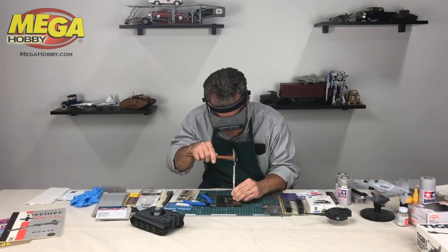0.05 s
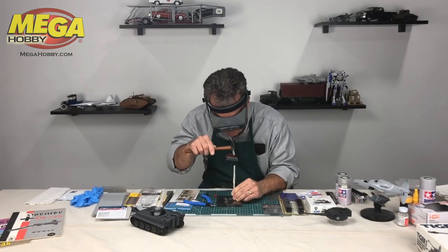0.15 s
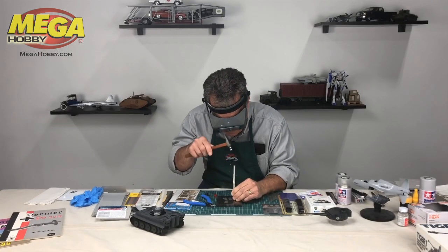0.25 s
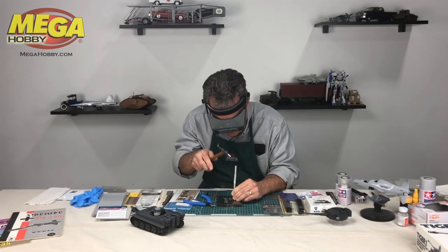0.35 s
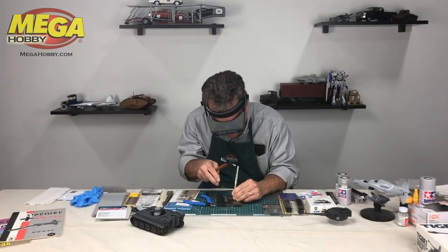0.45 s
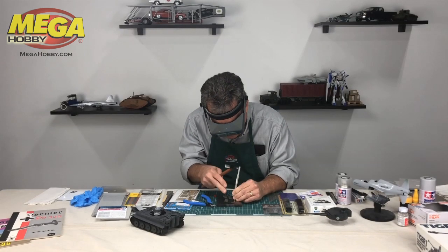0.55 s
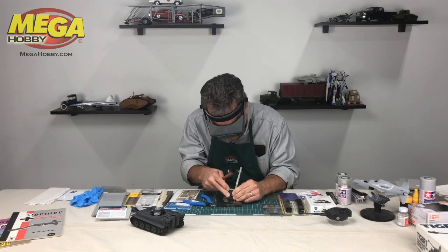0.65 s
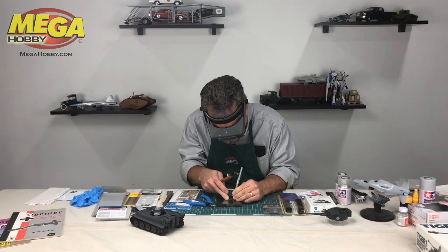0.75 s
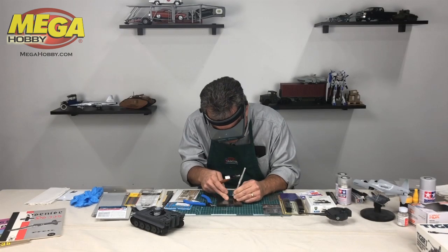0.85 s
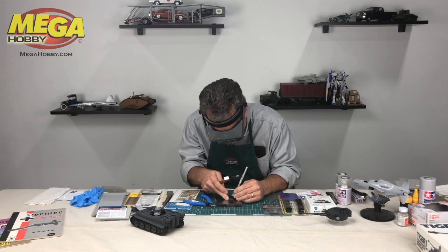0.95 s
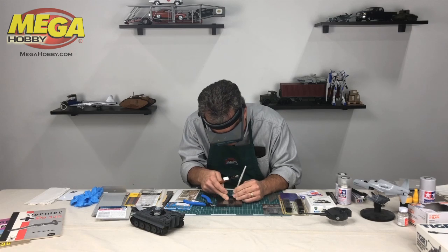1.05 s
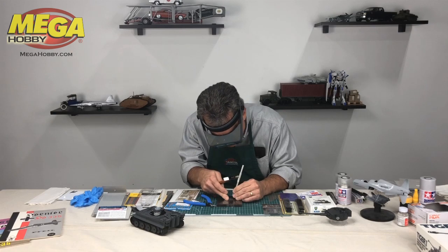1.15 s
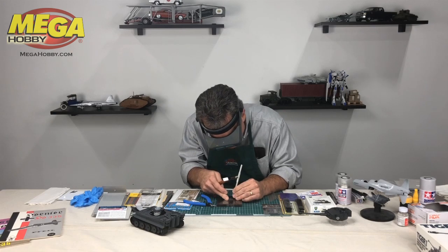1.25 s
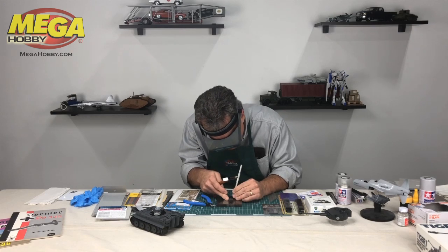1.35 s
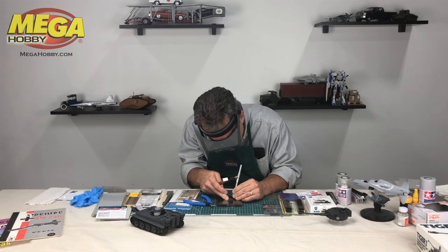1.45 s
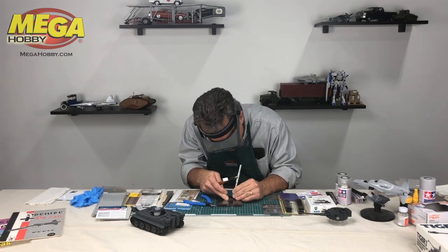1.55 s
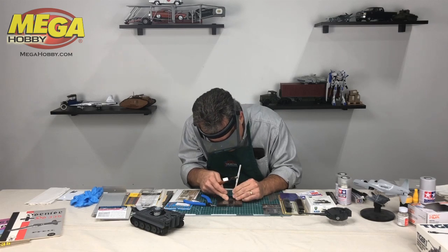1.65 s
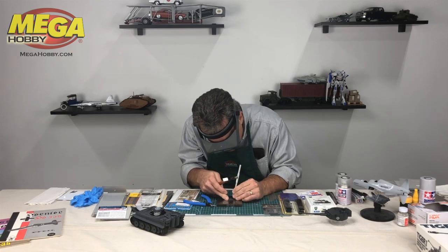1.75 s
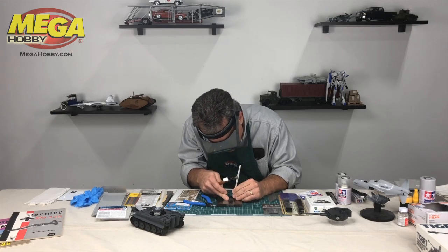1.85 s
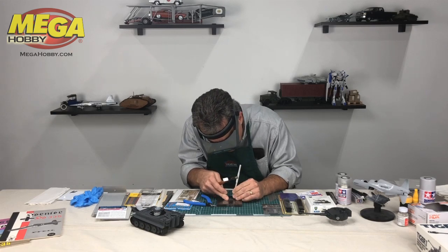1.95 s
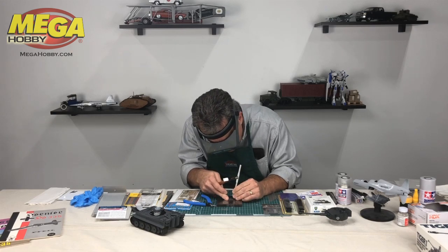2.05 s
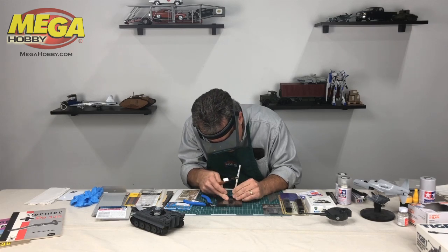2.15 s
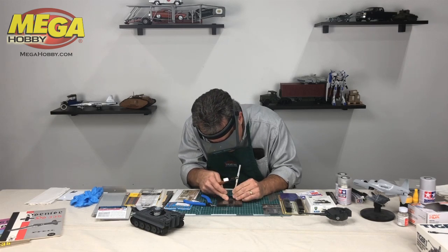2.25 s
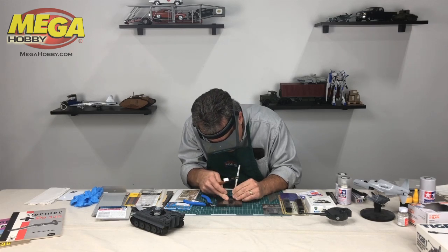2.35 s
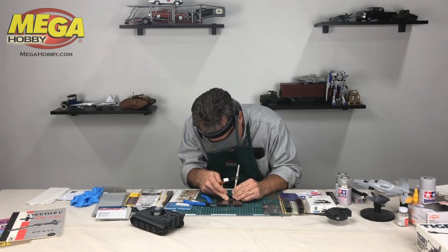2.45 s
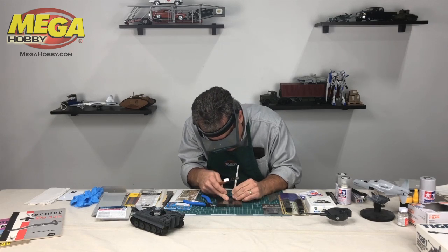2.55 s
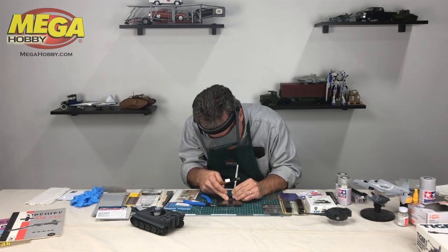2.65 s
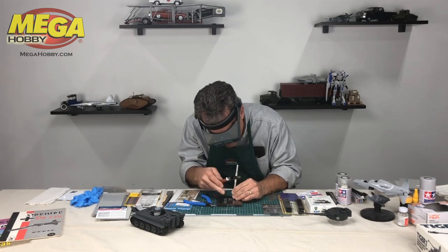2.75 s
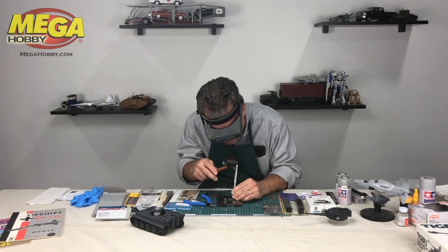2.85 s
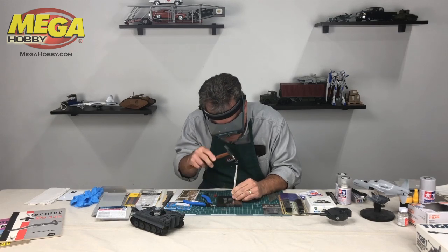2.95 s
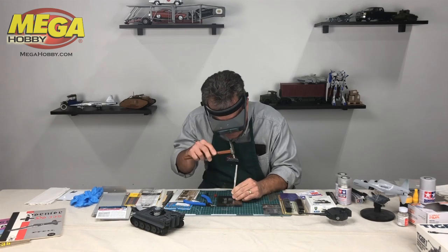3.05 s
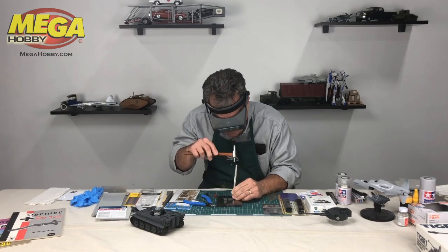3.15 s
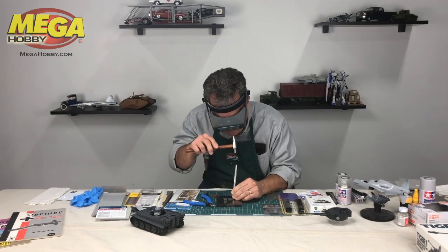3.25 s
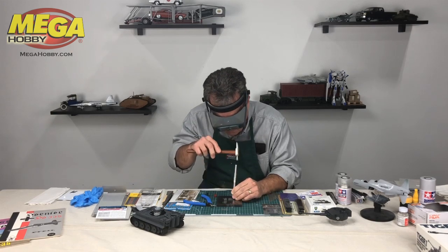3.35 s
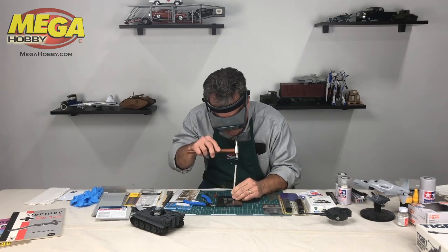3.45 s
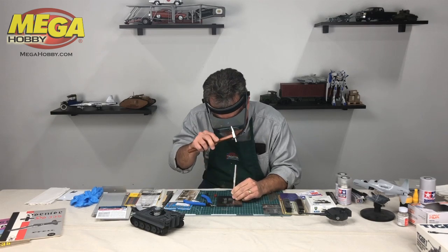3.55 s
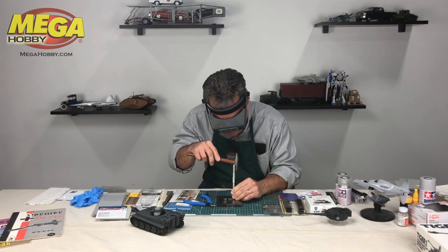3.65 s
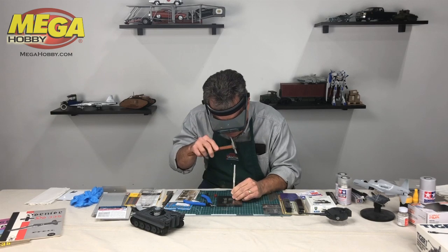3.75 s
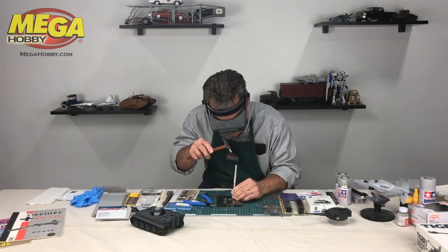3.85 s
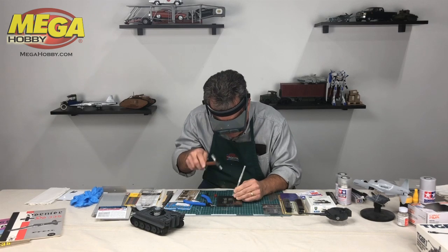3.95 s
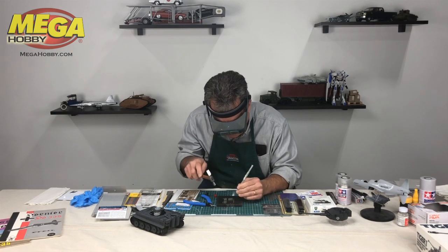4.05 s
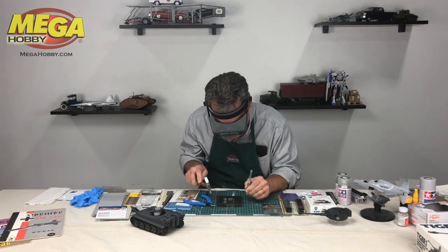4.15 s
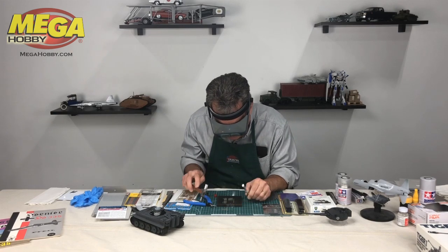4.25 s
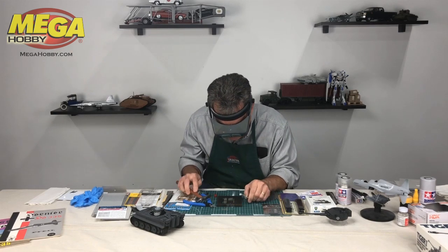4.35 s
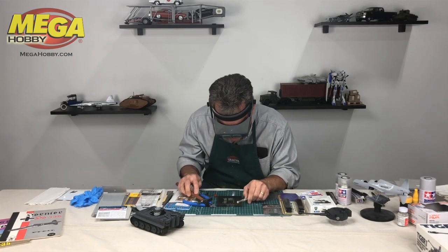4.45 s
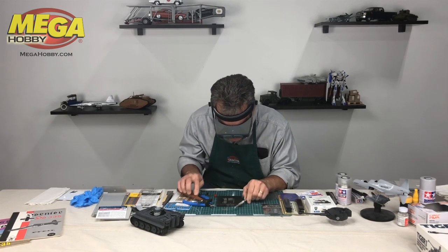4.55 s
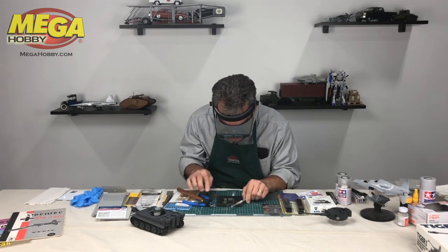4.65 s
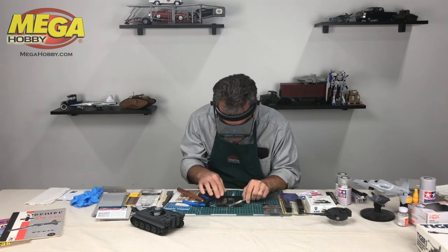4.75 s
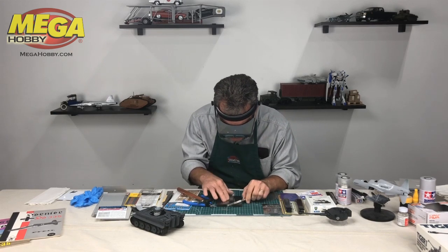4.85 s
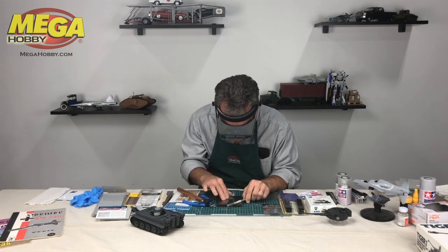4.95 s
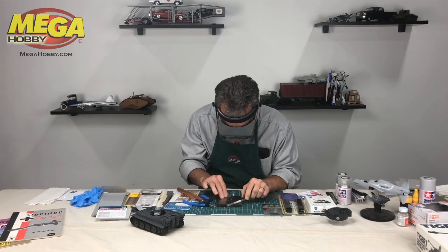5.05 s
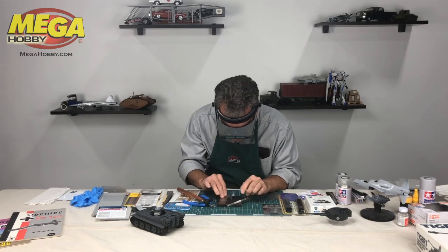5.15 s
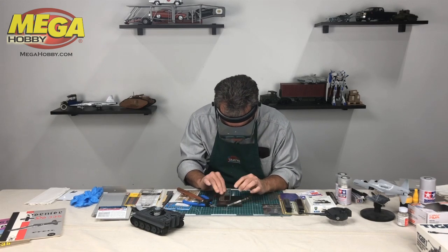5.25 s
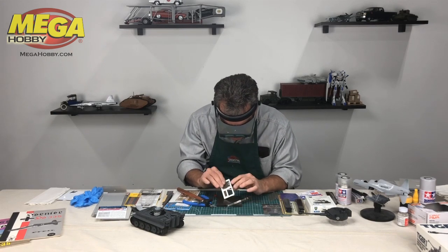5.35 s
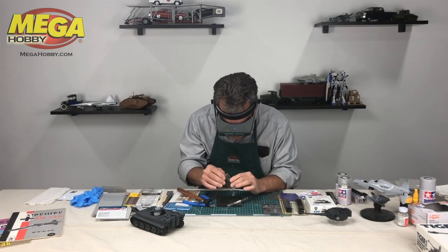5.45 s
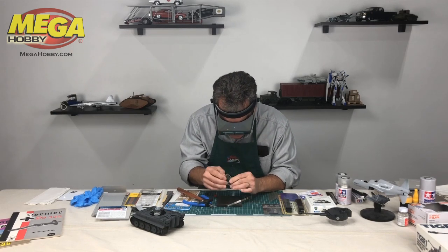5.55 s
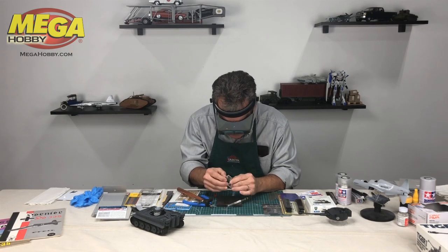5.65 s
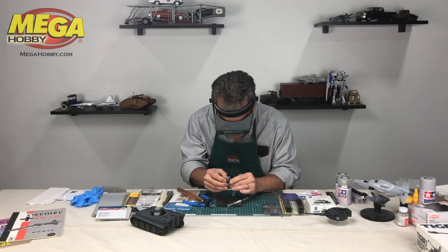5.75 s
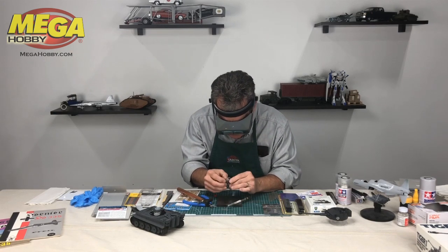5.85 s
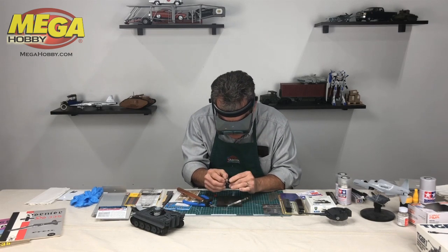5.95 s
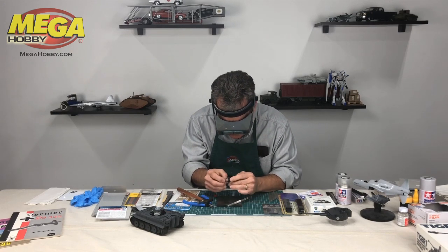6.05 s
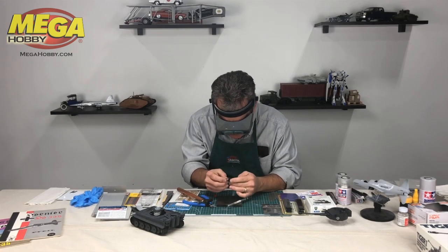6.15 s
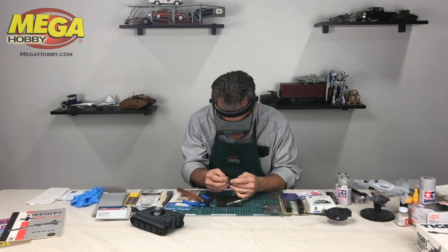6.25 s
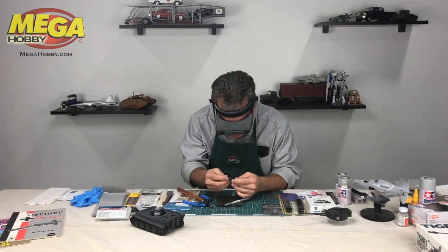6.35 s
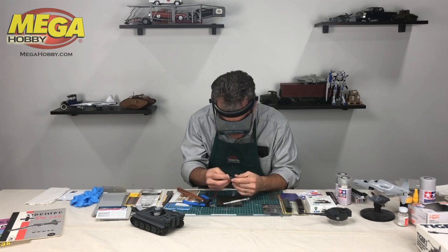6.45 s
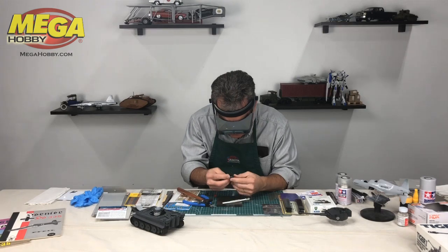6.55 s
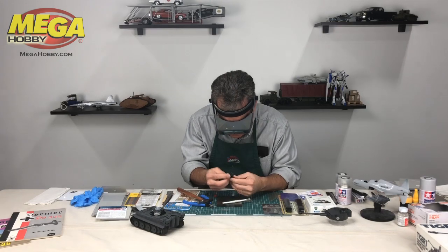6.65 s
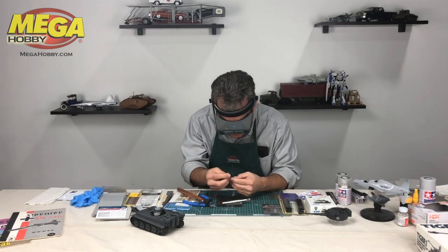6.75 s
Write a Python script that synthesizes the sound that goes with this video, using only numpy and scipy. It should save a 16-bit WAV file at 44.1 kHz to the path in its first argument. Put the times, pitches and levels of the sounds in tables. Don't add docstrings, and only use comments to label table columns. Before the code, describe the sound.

One loud steel crack with a short bench boom opens the scene, its reverberation filling a hard, empty room. Small metallic taps and faint scrapes give way to quiet buzz and airy rumble. Midway, a moderate blow is answered by a harder, clipping one with a brief blade rattle. Afterwards come a cluster of wooden and metallic knocks, gritty rubs, a small squeak and delicate tinkles in the fingers, all heard from a close microphone.

```python
import sys
import numpy as np
from scipy import signal
from scipy.fft import rfft, irfft
from scipy.io import wavfile
from scipy.ndimage import uniform_filter1d

SR = 44100
rng = np.random.default_rng(int(sys.argv[2]) if len(sys.argv) > 2 else 0)


def magnitude_from_level(level_db):
    exponent = np.asarray(level_db, float) / 20
    return 10 ** exponent


def materialize(psi):
    bounded = np.clip(np.atleast_2d(psi).T, -1, 1)
    quanta = np.round(bounded * 32767).astype(np.int16)
    wavfile.write(sys.argv[1], SR, quanta)


N = 299747

# f/Hz, level/dB
AIR_SPECTRUM = [(15, -2.5), (50, 0), (90, -15.5), (200, -19.5), (500, -31), (1300, -42.5), (5000, -47),
                (15000, -55)]
CHARGE_PULSES = [(.195, .335, -1), (.71, .82, 1)]
BLOW_TIMES = [
    .0452,
    3.3972,
    3.6426,
]
# crack level/dB, bench level/dB, plate knock level/dB, hammer ring level/dB
BLOW_LEVELS = [
    (-1, -2, -1.5, -41.5),
    (-18, -12.5, -6.5, -33.5),
    (-0.5, 1.5, 2.5, -37),
]
# f/Hz, t60/s, signed share at the blow, signed share in the rebound through the legs
BENCH_MODES = [(55.4, 0.11, 0.27, 0.22), (97, .2, -0.03, -0.045), (198.6, 0.26, -.2, 0.21),
               (278, 0.1, -0.33, 0.37), (356, 0.036, -0.36, 0.011), (415.3, 0.16, -0.19, -0.2),
               (484.6, 0.11, -0.86, -0.29), (581.7, 0.13, -0.38, -0.31), (646, 0.25, -0.006, 0.035),
               (687, 0.063, .1, -0.12), (746, 0.15, -0.1, 0.04), (865, 0.1, -.06, -.05),
               (981, 0.2, -0.013, .01), (1090, 0.033, 0.28, -0.21)]
# f/Hz, level/dB, t60/s
PLATE_MODES = [(1212, 3, 0.01), (1490, -10.5, 0.011)]
# f/Hz, level/dB, t60/s
EDGE_MODES = [(1833, -1.5, 0.011), (2190, 0, 0.0077)]
# f/Hz, level/dB, t60/s
HAMMER_MODES = [(2000, -3, .014), (4800, -9, .014), (6850, -6, .012), (8800, -10, .015), (10400, -3, .085),
                (12780, -3, .016)]
# f/Hz, level over the head's ring/dB,
# t60/s
FACE_MODES = [(12750, 12, .012), (4300, 8, .008), (6100, 5, .006), (14800, 2, .004)]
# t/s, crack level/dB, crack f/Hz, hammer ring level/dB
BLADE_CHATTER = [
    (0.0543, -9.5, 7000, -53.5),
    (0.0551, -27.5, 9000, -51),
    (3.4039, -29, 6000, -51),
    (3.6505, -26.5, 9000, -41),
    (3.6542, -27.5, 9535, -44),
    (3.6703, -21, 8000, -48.5),
    (3.677, -30, 9500, -47),
    (3.6858, -28.5, 6500, -43),
]
# f/Hz, t60/s, energy level against the direct sound/dB
ROOM_BANDS = [(80, 0.7, -8.5), (200, 0.65, -8), (430, 0.6, -12.5), (880, 0.96, -11.5), (1350, 0.82, -17),
              (1860, .55, -17), (3700, 0.45, -16), (7000, 0.78, -20), (11500, .3, -25), (15000, .12, -34),
              (2000, 0.66, -28.5), (4500, 2.4, -26.5)]
# t/s, bench level/dB, hardness = crack over bench level/dB
TOOL_KNOCKS = [(.422, -47, -14), (4.02, -47.5, -14), (4.312, -39, -25), (4.319, -44, -13),
               (4.339, -39, -36), (4.402, -41.5, -7), (4.4054, -33, -7.5), (4.4235, -37.5, -5),
               (4.438, -37, -3.5), (4.451, -41.5, -7), (4.516, -45, -11), (4.5342, -56, 2),
               (4.566, -36.5, 13), (4.5752, -30, -5.5), (4.594, -39, -13), (4.6066, -43, -1),
               (4.6221, -37, -12), (4.662, -60.5, 12), (4.7, -57.5, -4), (4.753, -49, -3.5),
               (4.787, -51, -3), (6.332, -51, -15), (6.362, -53.5, -6), (6.41, -58.5, -9.5),
               (6.47, -53, -19)]
# t/s, crack level/dB, hammer ring level/dB
HAMMER_TAPS = [
    (0.5696, -26.5, -35.5),
    (0.6567, -20.5, -41.5),
    (.662, -29, -49),
    (0.666, -37.5, -47),
]
# f/Hz, level/dB, t60/s
HANDLE_MODES = [(752, 4, 0.012), (1027, 3, 0.012), (1370, -12.5, 0.029), (2130, -14, 0.019)]
# t/s, length/s, level/dB, bright level/dB, bright f/Hz
RUB_STROKES = [(.62, .04, -60, -8, 3000), (.653, .022, -44, -8, 2500), (.715, .05, -58, 0, 8500),
               (.755, .09, -57.5, -5, 3500), (0.797, 0.6, -69, -9, 5000), (2.596, 0.94, -66.5, -6, 4020),
               (3.997, .35, -65.5, -8, 4500), (4.388, 0.082, -61, -15, 9000), (4.54, 0.19, -63, -27, 4017),
               (4.823, 0.17, -63, -3.5, 5000), (4.935, 0.23, -61.5, -5.5, 7000),
               (5.099, 0.64, -71.5, -13, 4977), (6.317, 0.13, -67.5, -4.5, 4000),
               (6.421, 0.17, -73, -1.5, 4500)]
# t/s, f/Hz, level/dB
SQUEAK_GLIDE = [
    (4.249, 2080, -72),
    (4.254, 1665, -58),
    (4.27, 1490, -59),
    (4.285, 1480, -71),
]
# f/Hz, level/dB, t60/s, mode group
PART_MODES = [(8500, 0, .07, 0), (9873, -5, .08, 0), (6444, -5, .02, 0), (2200, -1, .05, 1),
              (3600, 0, .06, 2), (3730, -5, .03, 2), (3246, -6, .03, 2), (5040, -1, .08, 3)]
# level/dB of mode groups top, low, middle, upper
GRIP_LEVELS = [
    (-15, -11, 0.5, -24),
    (1.5, -17, -8, -10),
    (-7, -1, -8.5, -3.5),
    (-14, -16, -5, 2),
    (-10, -11, 5, -3),
]
# t/s, level/dB
GRIP_TOUCHES = [
    [(.7657, -62), (4.8429, -57), (4.8688, -48), (4.8973, -57), (4.9115, -55), (4.9945, -52)],
    [(.7302, -61.5), (4.872, -51), (4.899, -57), (6.344, -56), (6.4114, -68), (6.51, -59), (6.6219, -69.5)],
    [(.7804, -56), (6.332, -48), (6.3604, -60)],
    [(.7954, -56), (.8074, -64), (6.456, -69), (6.4814, -65.5)],
    [(4.566, -39.5)],
]


def band(x, hz, width):
    edges = np.clip(hz * 2. ** np.array([-width / 2, width / 2]), 10, 20000)
    return signal.sosfilt(signal.butter(2, edges, "band", fs=SR, output="sos"), x)


def rings(hz, t60, count=3500):
    t = np.arange(count, dtype=np.float32)[:, None] / np.float32(SR)
    rate = 2j * np.pi * hz - np.log(1000) / t60
    return np.exp(t * rate.astype(np.complex64)).imag


def modes(table):
    hz, db, t60 = np.transpose(table)
    return rings(hz, t60) @ magnitude_from_level(db + 3.8 * rng.standard_normal(len(hz)))


def add(out, s, sound):
    i = int(s * SR)
    out[i:i + len(sound)] += sound[:N - i]


def air():
    hz, db = np.transpose(AIR_SPECTRUM)
    f = np.arange(N // 2 + 1) * SR / N + 1
    spectrum = rfft(rng.standard_normal(N)) * magnitude_from_level(np.interp(np.log(f), np.log(hz), db))
    low = 1 / (1 + (f / 150) ** 2)
    steps = np.repeat(rng.standard_normal(N // 4000 + 1), 4000)[:N]
    swell = magnitude_from_level(3.0 * uniform_filter1d(steps, 4000))
    x = irfft(spectrum * low, N) * swell + irfft(spectrum * (1 - low), N)
    return x / x.std() * magnitude_from_level(-49)


def mains():
    mains_hz, fan_hz = 60.01, 58.39
    buzz_db, hum_db, fan_db = -52, -57, -62
    t = np.arange(N) / SR
    k = np.arange(2, 200)[:, None]
    cycle = np.arange(2048) / 2048
    shape = 0
    for start, end, sign in CHARGE_PULSES:
        rise = np.sin(2 * np.pi * k * (cycle - start))
        fall = np.sin(2 * np.pi * k * (cycle - end))
        shape = shape + sign * (rise - fall) / (np.pi * k)
    shape = (shape / np.sqrt(1 + (k * mains_hz / 5000) ** 2)).sum(axis=0)
    buzz = magnitude_from_level(buzz_db) * np.interp(t * mains_hz % 1, cycle, shape, period=1)
    hum = magnitude_from_level(hum_db) * np.sin(2 * np.pi * mains_hz * t) - magnitude_from_level(fan_db) * np.sin(2 * np.pi * fan_hz * t)
    return buzz + np.sqrt(2) * hum


def bench_modes(push_ms):
    hz, t60, first, rebound = np.transpose(BENCH_MODES)
    ring = rings(hz, t60, count=8000)
    lag = int(.0093 * SR)
    x = ring * first
    x[lag:] += (ring * rebound)[:-lag]
    return uniform_filter1d(x, max(int(push_ms * SR / 1000), 1), axis=0, mode="constant")


def bench(top, scatter):
    return top @ (1 + scatter * rng.standard_normal(top.shape[1]))


def crack(hz, width, ms):
    x = rng.standard_normal(1500) * np.exp(-np.arange(1500) / (ms * SR / 1000))
    x = band(band(x, hz, width), hz, width)
    return x / np.abs(x).max()


def blows(top):
    seat_s = .0003
    edge_db, splash_db = -3.5, 13.5
    body, sharp, splash = np.zeros(N), np.zeros(N), np.zeros(N)
    for s, (crack_db, bench_db, plate_db, ring_db) in zip(BLOW_TIMES, BLOW_LEVELS):
        knock = -magnitude_from_level(plate_db) * modes(PLATE_MODES) - magnitude_from_level(crack_db + edge_db) * modes(EDGE_MODES)
        add(body, s, magnitude_from_level(bench_db) * bench(top, scatter=0.08))
        add(body, s + seat_s, 0.39 * knock)
        add(sharp, s + seat_s, 0.81 * knock)
        add(body, s, magnitude_from_level(ring_db) * 0.91 * modes(HAMMER_MODES))
        add(sharp, s, magnitude_from_level(ring_db) * modes(FACE_MODES))
        add(sharp, s, magnitude_from_level(crack_db) * crack(7200, 1.8, ms=1.5))
        add(splash, s, magnitude_from_level([crack_db + splash_db]))
    for s, crack_db, hz, ring_db in BLADE_CHATTER:
        add(sharp, s, magnitude_from_level(crack_db) * crack(hz, 2.2, ms=1.7))
        add(body, s, magnitude_from_level(ring_db) * (0.3 * modes(HAMMER_MODES) + 0.4 * modes(FACE_MODES[:1])))
    return body, sharp, band(splash, 5600, 2.3) + magnitude_from_level(8) * band(splash, 500, 2.2)


def room(x):
    t, tail = np.arange(SR) / SR, 0
    for hz, t60, db in ROOM_BANDS:
        noise = band(rng.standard_normal(SR), hz, 0.9) * np.exp(-np.log(1000) * t / t60)
        tail = tail + magnitude_from_level(db) * noise * np.sqrt(2 * np.log(1000) / (t60 * SR))
    return signal.fftconvolve(x, tail * np.minimum(t / 0.0085, 1))[:N]


def ticks(top):
    soft_hz, hard_hz, turn_db, turn_width_db = 2500, 7000, -47.5, 0.5
    out = np.zeros(N)
    damped = top * np.exp(-np.arange(len(top)) / (0.028 * SR))[:, None]
    for s, crack_db, ring_db in HAMMER_TAPS:
        add(out, s, magnitude_from_level(crack_db) * crack(8000, 3.0, ms=2.0))
        add(out, s, magnitude_from_level(crack_db - 36) * modes(HANDLE_MODES)[:1500])
        add(out, s, magnitude_from_level(ring_db) * modes(HAMMER_MODES))
    for s, bench_db, hard_db in TOOL_KNOCKS:
        crack_db = bench_db + hard_db
        hz = soft_hz + (hard_hz - soft_hz) / (1.5 + np.exp((turn_db - crack_db) / turn_width_db))
        add(out, s, magnitude_from_level(crack_db - 1.0) * crack(hz, 2.0, ms=2.0))
        add(out, s, magnitude_from_level(bench_db + 0.5) * bench(damped, scatter=1.0))
        add(out, s, -magnitude_from_level(bench_db + 0.5 + .35 * hard_db) * modes(HANDLE_MODES))
    return out


def rubs():
    rise = .4
    t = np.arange(N) / SR
    grains = np.repeat(rng.exponential(size=N // 40 + 1).clip(0, 4), 40)[:N]
    grit = rng.standard_normal(N) * magnitude_from_level(2.7 * grains)
    dull = band(grit, 900, 2.7)
    rough, out = dull / dull.std(), np.zeros(N)
    for s, length, db, bright_db, hz in RUB_STROKES:
        bright = band(grit, hz, 1.1)
        speed = np.interp(t, [s, s + rise * length, s + length], [0, 1, 0])
        out += magnitude_from_level(db) * speed * (rough + magnitude_from_level(bright_db) * bright / bright.std())
    s, hz, db = np.transpose(SQUEAK_GLIDE)
    t = np.arange(s[0], s[-1], 1 / SR)
    phase = 2 * np.pi * np.cumsum(np.interp(t, s, hz)) / SR
    add(out, s[0], magnitude_from_level(np.interp(t, s, db)) * np.sin(phase))
    return out


def tinkles():
    out = np.zeros(N)
    hz, db, t60, group = np.transpose(PART_MODES)
    group = np.round(group).astype(int)
    for grip_db, touches in zip(GRIP_LEVELS, GRIP_TOUCHES):
        for s, touch_db in touches:
            grip = rng.standard_normal(len(hz) + 1)
            gain = magnitude_from_level(touch_db + db + np.array(grip_db)[group])
            bend = 1 + np.where(hz < 4000, .025, .003) * grip[1:]
            ring = rings(hz * bend, t60, count=2500) @ gain
            free_s = 0.018 * np.exp(0.3 * grip[0])
            slip = magnitude_from_level(4.0 * uniform_filter1d(np.repeat(rng.standard_normal(25), 100), 60))
            add(out, s, slip * ring / (1 + (np.arange(len(ring)) / (free_s * SR)) ** 6))
            add(out, s, magnitude_from_level(touch_db - 7) * crack(4500, 1.4, ms=0.73))
    return out


def scene():
    top = bench_modes(push_ms=0.28)
    body, sharp, splash = blows(top)
    touch = ticks(top)
    work = body + rubs()
    part = tinkles()
    direct = work + touch + part + sharp
    tail = room(work + splash + magnitude_from_level(-1) * touch + magnitude_from_level(-9) * part)
    microphone = signal.butter(2, 13500, fs=SR, output="sos")
    heard = signal.sosfilt(microphone, direct + tail)
    return (heard + air() + mains())[None]


def top_cut(x):
    return signal.sosfilt(signal.butter(12, 16520, fs=SR, output="sos"), x)


def record(dry):
    mix = np.clip(dry, -1, 1)
    return top_cut(mix)


dry = scene()
out = record(dry)
materialize(out)
```